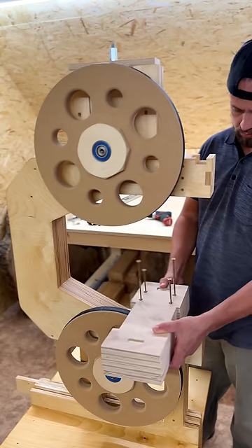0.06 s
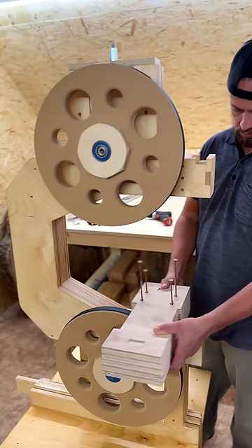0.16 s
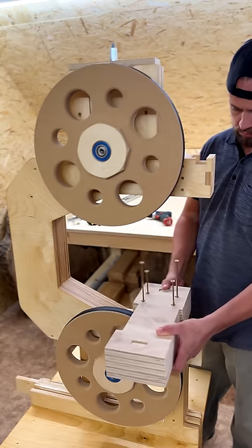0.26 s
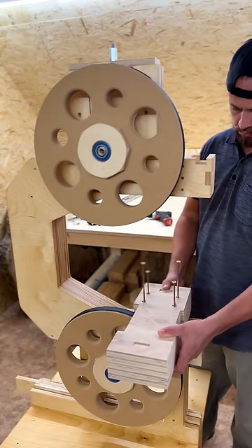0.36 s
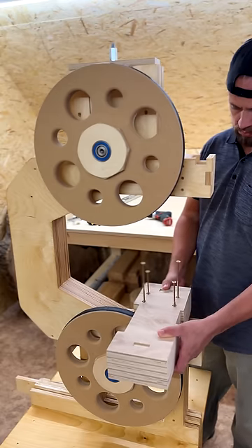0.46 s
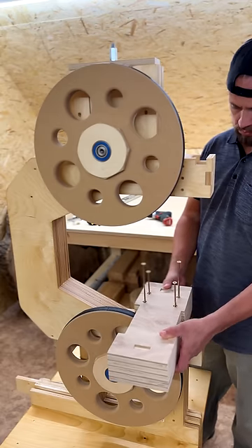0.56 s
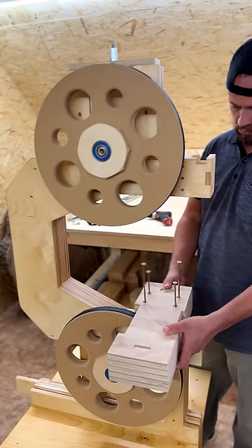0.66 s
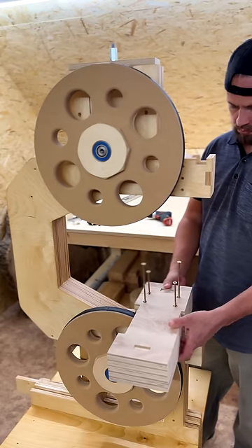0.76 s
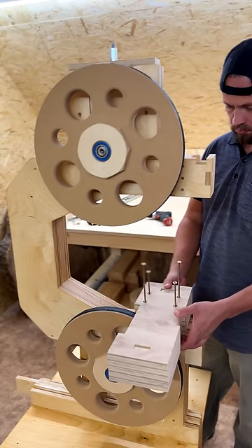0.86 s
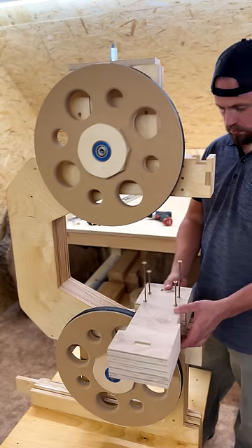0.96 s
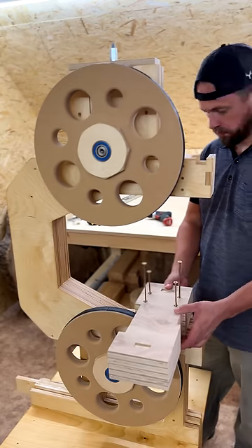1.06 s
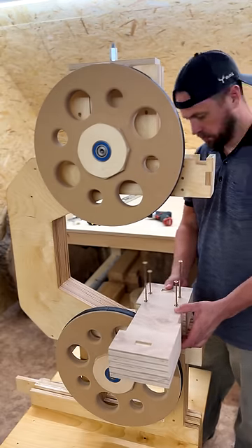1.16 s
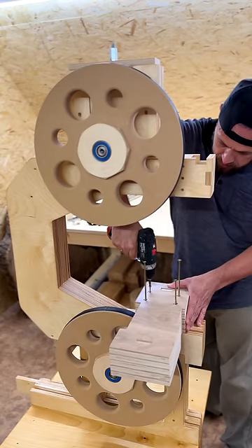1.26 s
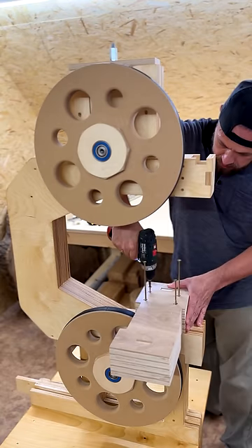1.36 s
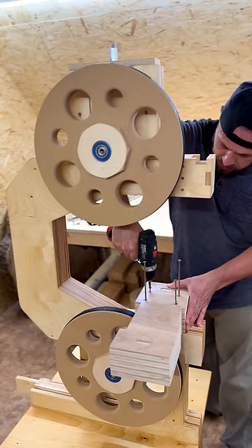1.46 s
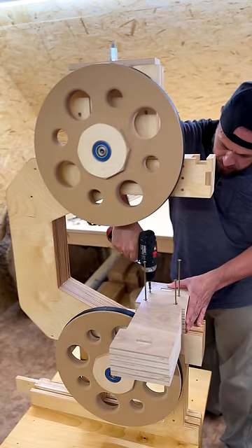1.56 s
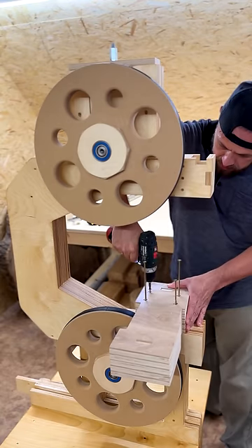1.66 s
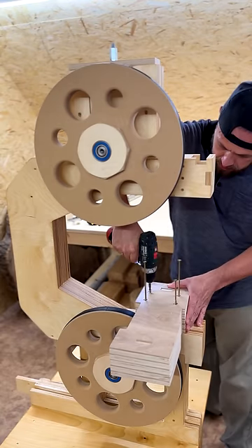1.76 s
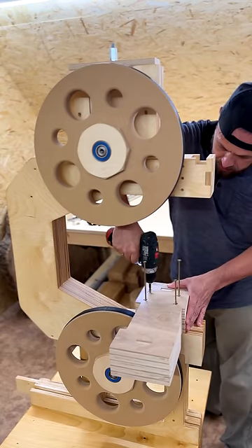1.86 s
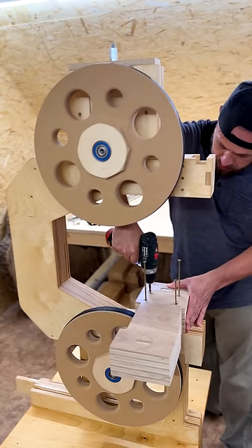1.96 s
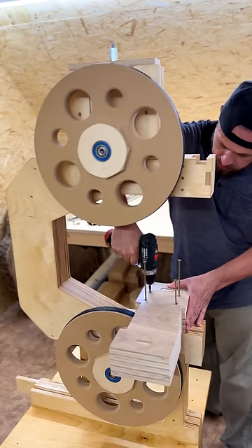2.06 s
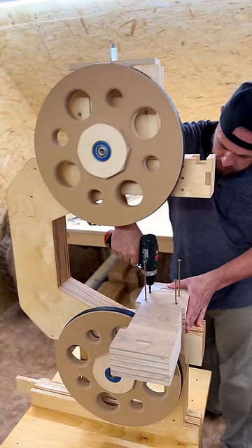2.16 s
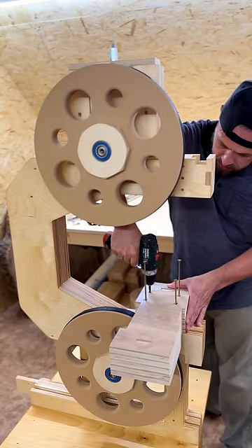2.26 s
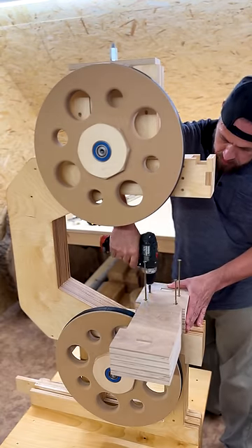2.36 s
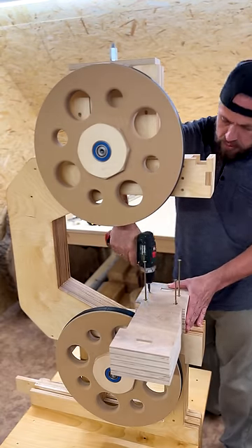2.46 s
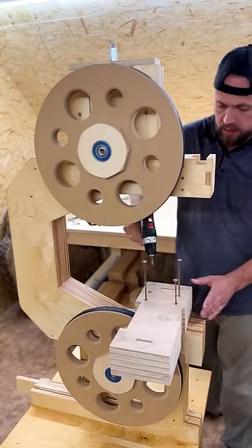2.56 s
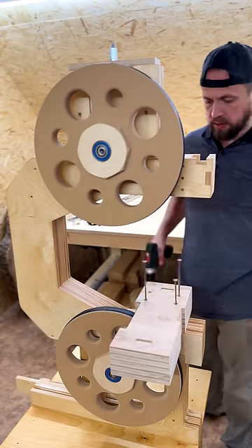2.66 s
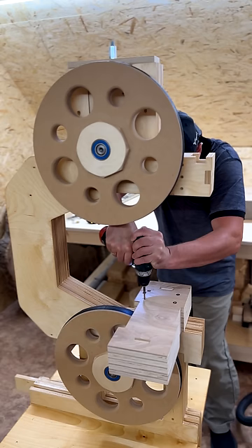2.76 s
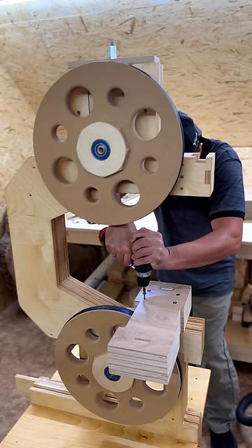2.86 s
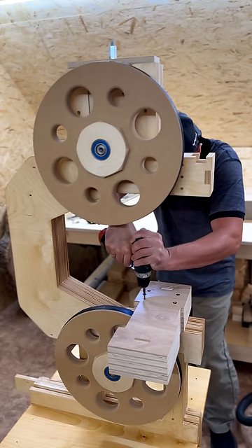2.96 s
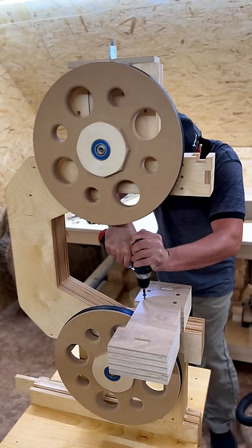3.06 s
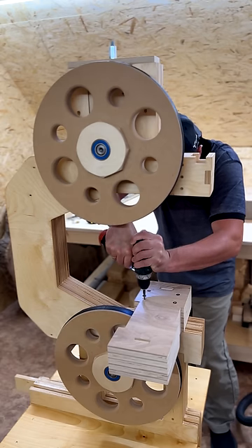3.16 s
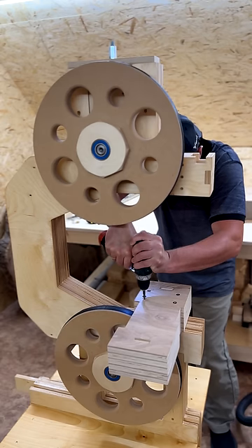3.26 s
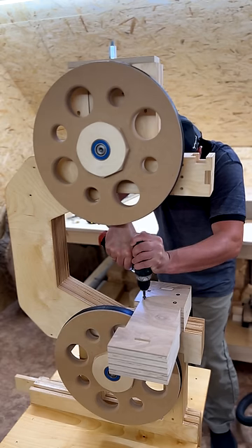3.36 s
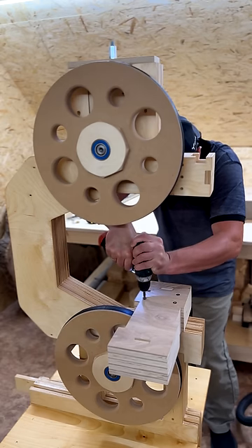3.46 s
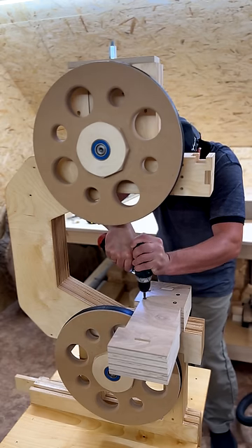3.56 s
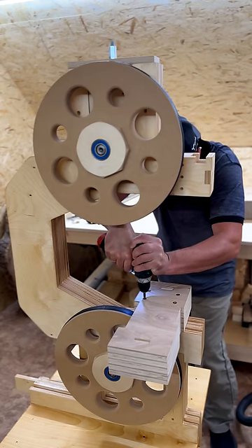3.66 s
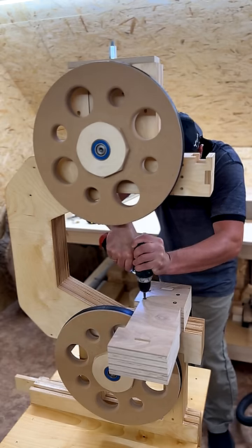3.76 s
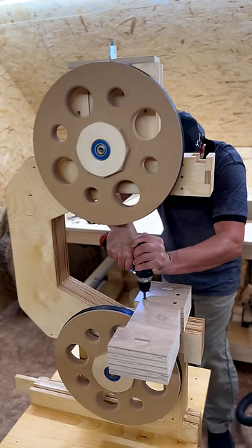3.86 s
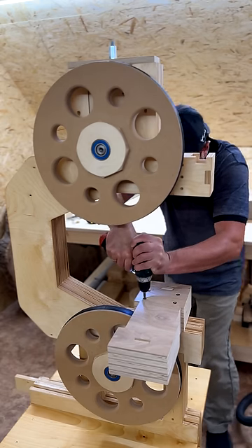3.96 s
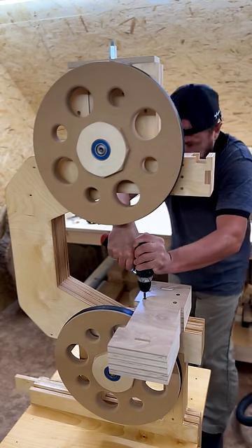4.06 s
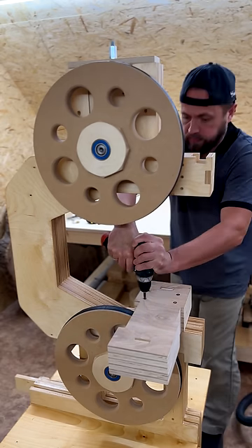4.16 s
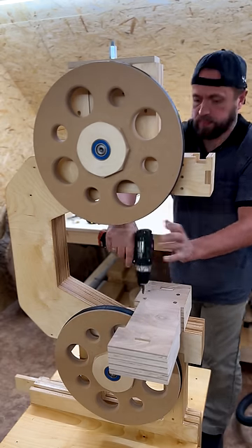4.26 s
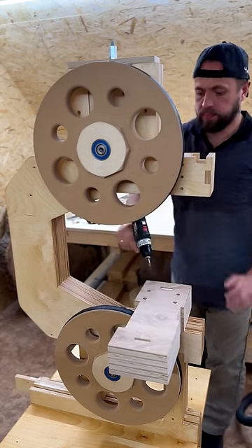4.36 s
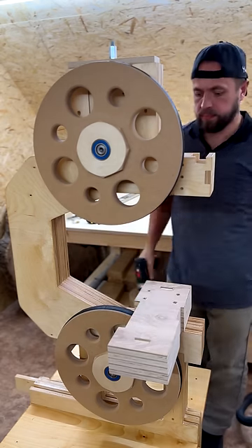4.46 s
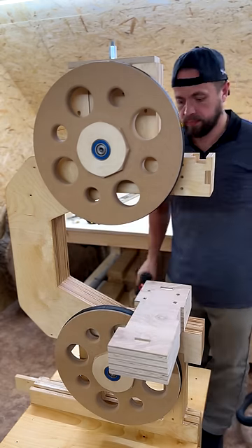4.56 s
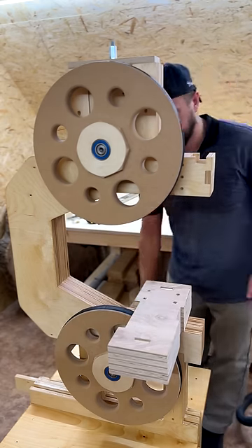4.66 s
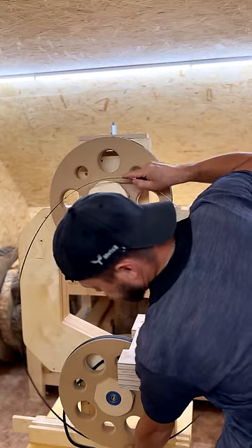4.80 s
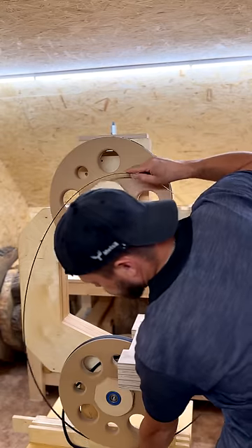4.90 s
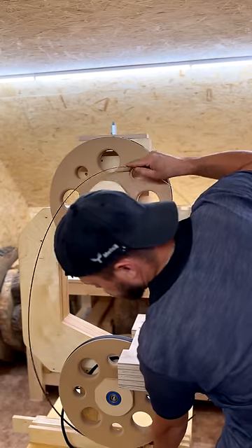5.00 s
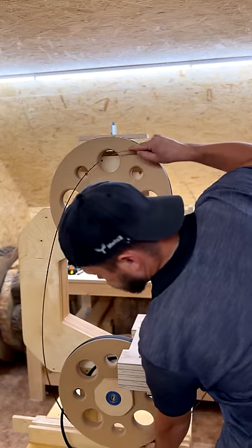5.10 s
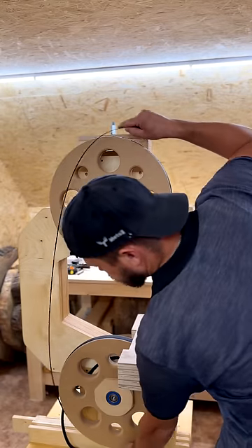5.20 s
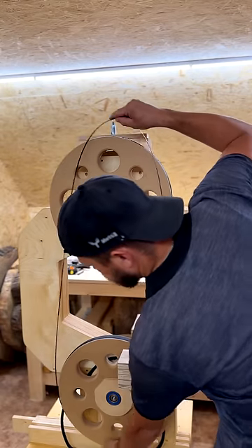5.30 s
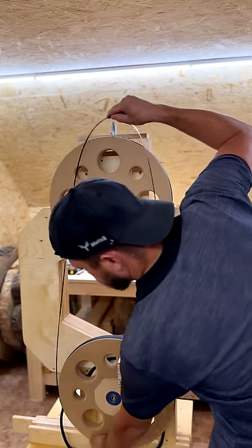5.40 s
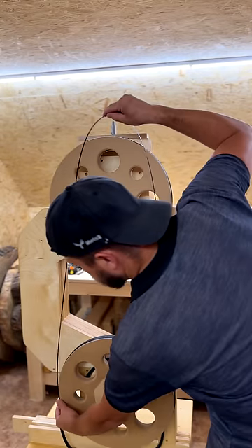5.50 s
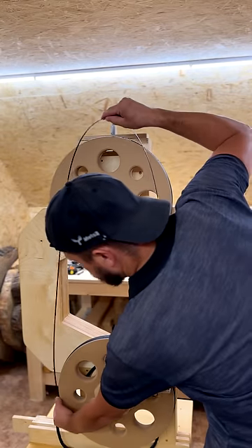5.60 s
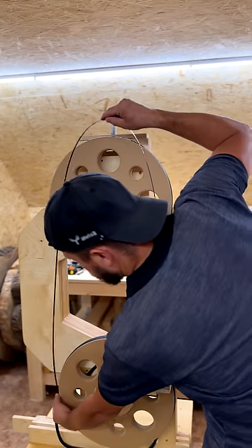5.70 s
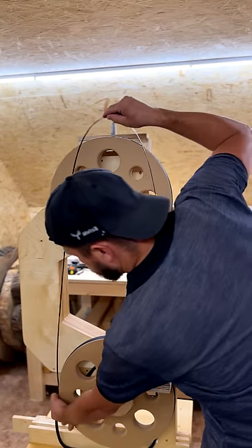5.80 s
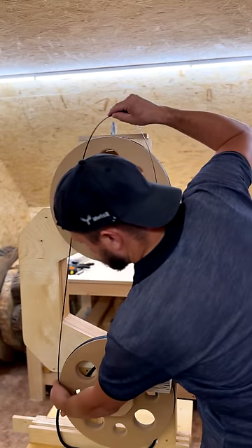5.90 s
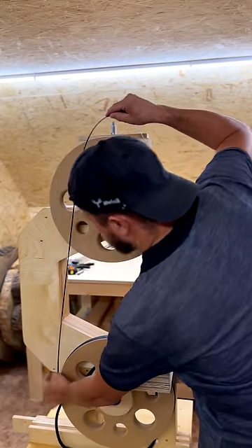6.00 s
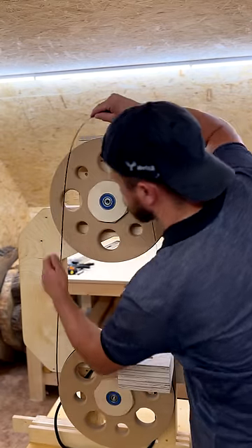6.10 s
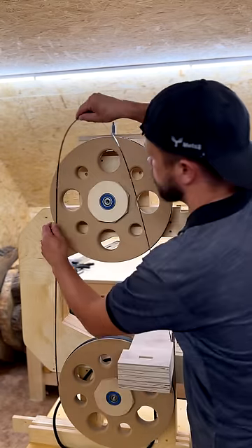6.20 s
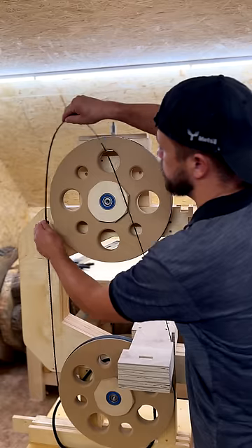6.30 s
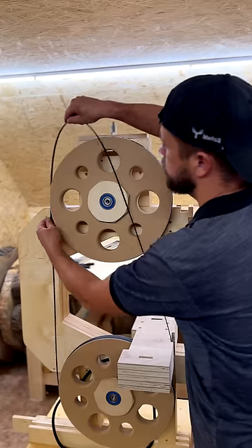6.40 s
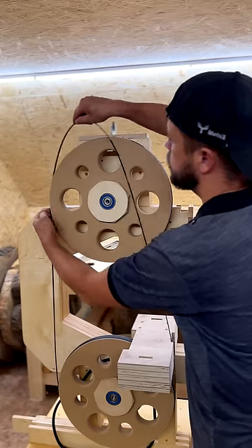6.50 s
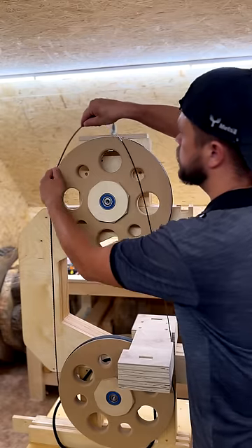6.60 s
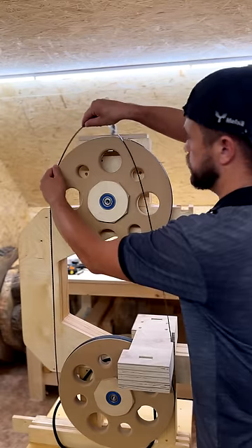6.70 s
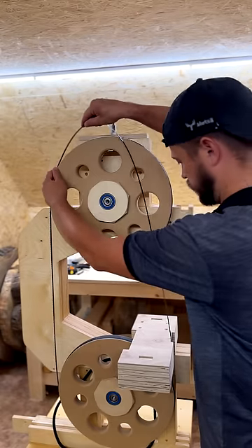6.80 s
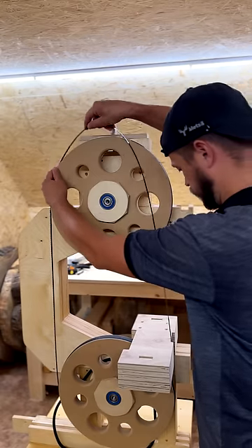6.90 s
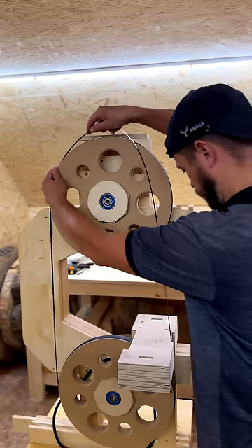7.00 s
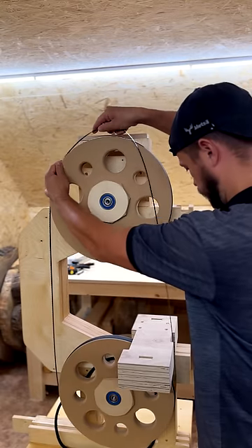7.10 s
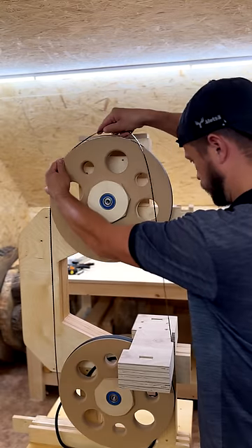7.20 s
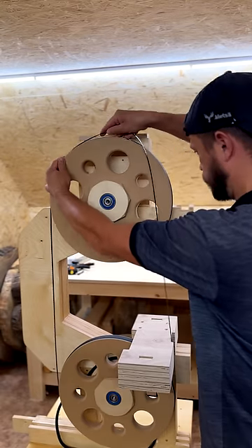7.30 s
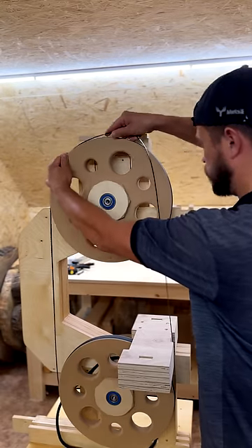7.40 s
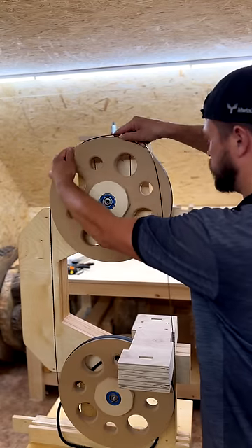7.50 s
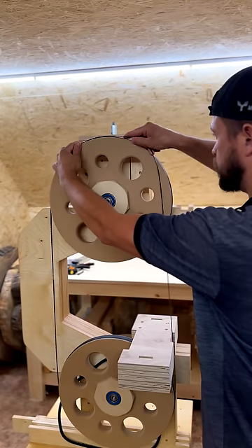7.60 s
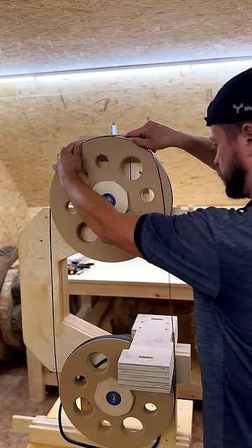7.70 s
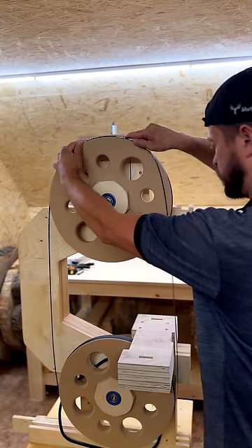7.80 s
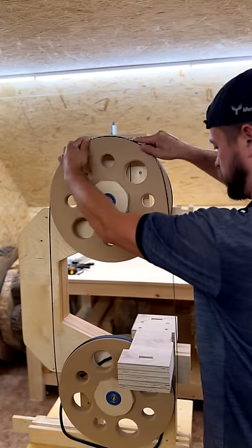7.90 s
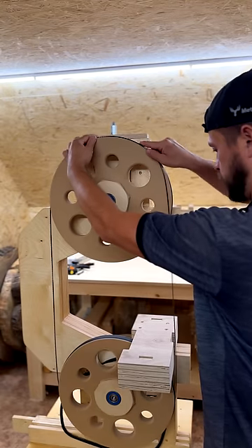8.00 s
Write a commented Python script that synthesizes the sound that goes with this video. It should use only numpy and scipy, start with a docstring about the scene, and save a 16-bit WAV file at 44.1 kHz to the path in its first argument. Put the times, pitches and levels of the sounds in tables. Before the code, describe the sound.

Close, slightly roomy stereo sound of workshop work. A power driver starts abruptly, screeches and hisses, stumbles as the bit jumps loose, and stops with cracks. It runs again, labours, then rattles rapidly like a tiny metal jackhammer before stopping with two lighter bangs. Afterwards, near silence holds faint hum and hiss, clothing swishes, springy steel ticks and dull taps on plywood, busiest at the end.

```python
"""A cordless impact driver sinks two screws into a plywood arm in a small board-lined workshop.
Tones tied to the motor speed, brush and fan hiss and shaken wood make its whine; the bit slips with a bang,
and late in the second screw the hammer rattles in a row of blows that ring tool and wood. Later a steel band
blade is laid over wooden wheels: bursts of noise ring the band as scrapes and clicks, among knocks on wood.
Cloth swishes and the hum and hiss of the room lie behind, and short dying reflections surround it all."""
import sys
import numpy as np
from scipy import signal
from scipy.fft import rfft, irfft
from scipy.io import wavfile

SR = 44100
rng = np.random.default_rng(int(sys.argv[2]) if len(sys.argv) > 2 else 0)


def persist_wave(psi):
    """Save psi, clipped to +-1, as 16-bit WAV."""
    counts = np.round(np.clip(psi, -1, 1) * 32767).astype(np.int16)
    wavfile.write(sys.argv[1], SR, np.atleast_2d(counts).T)


N = 355005
TIME = np.arange(N) / SR  # seconds
FIRST_BLOW_S = 3.6425  # the hammer engages


def amp(db):
    """Turns decibels into a factor."""
    return 10 ** (np.asarray(db) / 20)


def rms_one(x):
    """Scales a sound to an average strength (rms) of 1."""
    return x / np.sqrt(np.mean(x ** 2) + 1e-20)


def in_time(rows):
    """Columns of a table joined by straight lines in time."""
    s, *columns = np.transpose(rows)
    return [np.interp(TIME, s, column) for column in columns]


def colour(x, spectrum):
    """Filters x by the spectrum without letting it sound early (minimum phase)."""
    size = 8192
    hz, db = np.transpose(spectrum)
    bins_hz = np.fft.rfftfreq(size, 1 / SR)
    gain = amp(np.interp(np.log(bins_hz + 1), np.log(hz), db))
    # folding the cepstrum forward moves all the energy to the earliest moment
    cepstrum = irfft(np.log(gain))
    cepstrum[1:size // 2] *= 2
    cepstrum[size // 2 + 1:] = 0
    response = irfft(np.exp(rfft(cepstrum)))
    return signal.fftconvolve(x, response)[:len(x)]


def noise(spectrum):
    """Steady noise with the shape of a spectrum, rms 1."""
    return rms_one(colour(rng.standard_normal(N + SR), spectrum)[SR:])


def drift(rate_hz):
    """Slow random wavering of spread 1, computed at every 40th sample."""
    r = np.exp(-80 * np.pi * rate_hz / SR)
    slow = signal.lfilter([1], [1, -2 * r, r * r], rng.standard_normal(N // 40 + 2002))[2000:]
    return np.interp(np.arange(N) / 40, np.arange(len(slow)), rms_one(slow))


def ring(x, modes):
    """x strikes a body, and each of its modes (pitch Hz, level dB, time to fall 60 dB s) rings."""
    out = 0
    for hz, db, t60_s in modes:
        r = amp(-60 / (max(t60_s, .005) * SR))
        w = 2 * np.pi * hz / SR
        # the tiny offset keeps the filter from slowing down in silence
        out = out + signal.lfilter([0, amp(db) * np.sin(w)], [1, -2 * r * np.cos(w), r * r], x + 1e-18)
    return out


def band(x, order, low_hz, high_hz):
    """Keeps only the part of x between two frequencies."""
    return signal.sosfilt(signal.butter(order, [low_hz, high_hz], "band", fs=SR, output="sos"), x)


def high_pass(x, hz):
    """Takes away the lows of x."""
    return signal.sosfilt(signal.butter(4, hz, "high", fs=SR, output="sos"), x)


def add(out, s, sound, db):
    """Lays a sound into out at time s with its peak at db."""
    i = round(s * SR)
    out[i:i + len(sound)] += (amp(db) * sound / np.abs(sound).max())[:N - i]


def dying(t60_s, rise_s=0, hold_s=0):
    """A burst of noise that swells, is held and dies away, falling 60 dB in t60_s."""
    t = np.arange(SR // 3) / SR
    fall = amp(-60 * np.maximum(t - hold_s, 0) / t60_s)
    swell = np.minimum(1, (t + 1e-4) / (rise_s + 1e-4))
    return rng.standard_normal(len(t)) * fall * swell


def strokes(rows):
    """Gain of sounds that fade in, glide from one level to another and fade out."""
    fade_s = 0.022
    gain = 0
    for start, end, start_db, end_db in rows:
        times = [start - fade_s, start, end, end + fade_s]
        levels = [start_db - 40, start_db, end_db, end_db - 38]
        gain = gain + amp(np.interp(TIME, times, levels, -150, -150))
    return gain


def motor():
    """Slightly wavering tones on the motor speed, hiss of brushes and fan, and wood shaken through the bit."""
    # motor speed, bogging down around each slip: [time_s, turns_per_s]
    speed = [(1.22, 434), (1.52, 421), (1.65, 418.5), (1.8, 416), (1.85, 345), (1.865, 315), (1.96, 315),
             (1.975, 342), (1.99, 368), (2.005, 390), (2.05, 404), (2.19, 403), (2.225, 392), (2.255, 350),
             (2.47, 200), (2.79, 421), (2.95, 417), (3.32, 410), (3.45, 406), (3.54, 399), (3.62, 378)]
    # motor and gear tones: [multiple_of_turns, then levels before the changes below: start_db,
    # before_first_slip_db, after_first_slip_db, second_screw_start_db, second_screw_end_db]
    whine = [(1.0, -7, -7, -16, -14, -8), (1.495, -13, -4, -22, -38, -22), (1.565, -20, -25, -13, 1.5, -30),
             (1.94, -12, -13, -24, -36, -22), (2.92, -44, -40, -22, -29, -18), (3.79, -10, -16, -8, -4, -1),
             (3.97, -14, -15, -14, -22, -22), (4.07, -42, -41, -9, -20, -22),
             (4.18, -11, -11, -15, -16, -5), (5.95, -41, -28, -28, -13, -15),
             (7.58, -20, -12, -7, -14, -13), (7.88, -16, -18, -13, -18, -26),
             (8.32, -14, -14, -7, -15, -20), (13.45, -20, -7, -6, -13, -20),
             (14.93, -26, -24, -14, -17, -24), (19.25, -30, -30, -13, -30, -32),
             (19.53, -28, -26, -30, -13, -14)]
    # moments between which the tone levels glide: [time_s]
    stages_s = (1.33, 1.5, 1.89, 1.91, 2.6, 2.9, 3.15, 3.5)
    # shape of the brush and fan hiss: [frequency_hz, level_db_per_hz]
    hiss_shape = [(530, -36.5), (900, -12.5), (956, -20.5), (1170, -12.5), (1460, -9), (1590, -6),
                  (2020, -12.5), (3100, -8), (3400, -6.5), (3750, -10), (4250, -12), (5550, -10),
                  (5960, -10), (9310, -13.5), (11600, -3.5), (15100, -1), (16000, -11)]
    # shape of the shaking wood: [frequency_hz, level_db_per_hz]
    shake_shape = [(24, -67), (40, -46), (102, -11), (293, -20.5), (407, -1), (450, -16), (633, 2),
                   (709, -14.5), (806, -9.5), (1200, -13.5), (1560, -42), (2640, -120)]
    # pulls of the trigger: [start_s, release_s, coast_to_silence_s, base_hiss_db, wood_shaking_db,
    # tone_strength_db (against the hiss)]
    runs = [(1.225, 2.274, 0.245, -37.5, -49, -5.5), (2.798, 4.103, 0.15, -37, -51.5, -6)]
    midway_db = -3  # the tones ease halfway down the second screw
    labour_hiss_db, labour_tone_db = -12, 28  # change per whole loss of speed
    stall_loss, stall_db = .15, -350  # past this loss the tones break off, dB per whole loss
    hammering_hiss_db, hammering_tone_db = 1.5, -34  # change once the hammer engages
    gear_lines, gear_db = 48, -12  # gear_db is against the hiss, before labour and hammering
    spin_up_s, coast_curve = 0.005, 2  # sound falls 60 dB over the coast, slowly at first

    turns = in_time(speed)[0]
    angle = 2 * np.pi * np.cumsum(turns) / SR
    bogged = np.maximum(0, 1 - turns / 400)  # share of speed lost below 400 turns per s
    hammering = np.clip((TIME - FIRST_BLOW_S) / .03 + .5, 0, 1)

    tones = 0
    for k, early, first, second, start, end in whine:
        middle = (start + end) / 2 + midway_db
        db = np.interp(TIME, stages_s, [early, first, first, second, second, start, middle, end])
        # the highest and lowest tones break up when the motor labours
        db += 2.8 * drift(20) - (k ** 4 / 150 + 80 * (k < 2)) * bogged
        tones = tones + amp(db) * np.sin(k * angle + .18 * np.sqrt(k) * drift(10))
    labour_db = labour_tone_db * bogged + stall_db * np.maximum(0, bogged - stall_loss)
    tones = tones * amp(labour_db + hammering_tone_db * hammering)

    # sparking makes the hiss gritty
    hiss = noise(hiss_shape) * amp(0.87 * drift(300) + 0.48 * drift(4.2))
    # faint wavering lines of the planetary gears, spread between the strong tones
    gears = 0
    for k in np.geomspace(2.2, 21, gear_lines) * rng.uniform(.98, 1.02, gear_lines):
        gears = gears + amp(3 * drift(12)) * np.sin(k * angle + 1.5 * drift(20))
    # they sink when the motor labours or hammers
    gear_gain = amp(gear_db - 60 * bogged - 20 * hammering)
    hiss = hiss + gear_gain * rms_one(colour(gears, hiss_shape))

    shake = noise(shake_shape) * amp(2 * drift(7.1))
    out = 0
    for start, release, coast, hiss_db, shake_db, tone_db in runs:
        spin_up = np.clip((TIME - start) / spin_up_s + .5, 0, 1)
        coasting = amp(-60 * np.clip((TIME - release) / coast, 0, 2) ** coast_curve)
        loud = amp(hiss_db + labour_hiss_db * bogged + hammering_hiss_db * hammering)
        out = out + spin_up * coasting * (loud * (hiss + amp(tone_db) * tones) + amp(shake_db) * shake)
    return out


def hammer():
    """Blows on the anvil: a thin bright crack, a steel clack, a duller burst and a ring of tool and bit."""
    # shape of the dull burst on the anvil: [frequency_hz, level_db_per_hz]
    anvil = [(35, -55.5), (60, -22.5), (103, -29.5), (142, -7.5), (233, -12.5), (315, -14), (540, 5.5),
             (579, -2.5), (862, -5), (2090, 8), (3500, 1), (3940, -1.5), (9130, -6), (12400, -19.5),
             (16000, -37.5)]
    # tool and wood set ringing: [pitch_hz, relative_level_db, t60_s]
    tool = [(146, -17, 0.07), (588, -13, 0.1), (2135, -6, 0.06), (665, -14, .1), (1400, -16, 0.08),
            (1255, -16, 0.06), (1830, -14, 0.06), (2770, -14, 0.03)]
    # the ringing bit: [pitch_hz, relative_level_db, t60_s]
    bit = [(3480, -4, 0.06)]
    # the bit rings louder once the screw seats: [time_s, level_db]
    seating = [(3.95, -9), (4.03, 0)]
    beat_s, blows = .01356, 38
    settle_s, settle_blows = .0072, 4.5  # the first blows come slower, then settle to an even beat
    hammer_db = -24.5  # base level that the parts are set against
    clack_db, blow_spread_db = -28.5, 1.8  # the spread is how much the clacks differ

    out, clicks = np.zeros(N), np.zeros(N)
    number = np.arange(blows)
    lateness = settle_s * (1 - np.exp(-number / settle_blows))
    for at in FIRST_BLOW_S + beat_s * number + lateness:
        db = hammer_db + 1.2 * rng.standard_normal()
        add(out, at, band(dying(0.0058, 0.00062), 3, 11000, 15800), db + 7.0)
        add(out, at, band(dying(.02), 2, 3000, 6200), clack_db + blow_spread_db * rng.standard_normal())
        add(out, at, colour(dying(0.17), anvil), db - 5.0)
        clicks[round(at * SR)] = amp(hammer_db + 1.5 * rng.standard_normal())
    seated = amp(in_time(seating)[0])
    ringing = ring(clicks, tool) + seated * ring(clicks, bit)
    return high_pass(out + amp(-8) * ringing, 125)


def slips():
    """The bit jumps out of the screw head: a bang with a bright crack over a boom of the wood."""
    # slips of the bit: [time_s, bang_peak_db, wood_boom_peak_db, bright_crack_peak_db]
    slip_rows = [(1.865, -13.5, -21, -26.5), (2.3328, -14, -24, -31), (2.377, -13.5, -22, -24),
                 (2.455, -31.5, -29.5, -46), (3.6289, -16.5, -21, -23), (4.16, -25, -27, -35),
                 (4.192, -22.5, -29.5, -25.5)]
    # shape of the bang: [frequency_hz, level_db_per_hz]
    bang = [(410, -31), (700, -5.5), (922, -25), (1250, 2), (1920, -0.5), (2160, 0.5), (2800, 0.5),
            (3840, -15.5), (4610, -11), (7590, -24), (14000, -12.5), (16000, -20)]
    # shape of the booming wood: [frequency_hz, level_db_per_hz]
    boom = [(18, -47.5), (30, -15), (156, 2.5), (299, -2.5), (389, 2), (581, 7), (721, -8.5), (829, -6),
            (982, -9), (1200, -6), (1560, -33), (2640, -120)]
    t60_s = 0.12

    out = np.zeros(N)
    for s, db, boom_db, crack_db in slip_rows:
        add(out, s, colour(dying(t60_s) + amp(-2.0) * dying(0.019), bang), db)
        add(out, s, colour(dying(1.8 * t60_s), boom), boom_db)
        add(out, s, band(dying(0.56 * t60_s), 2, 3300, 6500), crack_db)
    return out


def blade():
    """Edge and teeth touch and slide on the wood: dry scratch, and clicks that stir the steel band."""
    # steel touching wheel and frame: [time_s, peak_db, drag_held_s, drag_t60_s, dryness_db (before a
    # common 19 dB), favoured_pitch_hz]
    touches = [(4.255, -64, 0, .03, 15, 12000), (4.3328, -58, 0.038, 0.1, 0, 2700),
               (4.765, -55.5, 0.0066, .06, 12, 4060), (5.3, -67.5, 0.039, 0.06, 6, 2390),
               (5.3553, -58, .022, 0.05, -6, 3300), (5.396, -56, .03, 0.08, -10, 4000),
               (5.4155, -56, .035, 0.06, -7, 3200), (5.484, -57, .028, 0.05, -8, 6000),
               (5.491, -56, .015, 0.06, -12, 2350), (5.543, -63, .005, 0.07, -4, 2200),
               (5.566, -57.5, 0.008, 0.066, -4, 2620), (6.4468, -67, 0.0021, 0.13, -4, 2500),
               (6.46, -55.5, 0.0081, 0.059, -13, 2600), (6.641, -62.5, 0.028, 0.073, 0, 2770),
               (7.093, -33.5, 0.0014, 0.09, 7, 3200), (7.1437, -53, 0, 0.054, -5, 2800),
               (7.206, -52.5, 0.0091, 0.04, -9, 2560), (7.239, -62, 0.023, 0.06, 11, 2200),
               (7.628, -49.5, 0.0057, 0.087, 24, 3000), (7.7, -60, 0.018, 0.065, -2, 1800),
               (7.724, -45, 0, 0.062, -5, 3120), (7.823, -47, 0, 0.073, -3, 1930),
               (7.8502, -49.5, 0.0027, 0.055, -16, 2510), (7.9149, -47.5, 0.026, 0.067, -18, 1840),
               (7.987, -58, 0.0096, 0.06, 16, 6000), (8.0275, -61, 0.0016, 0.057, -5, 2400)]
    # ringing of the steel band: [pitch_hz, relative_level_db, t60_s]
    band_modes = [(1776, -4, .022), (2290, -4, .02), (3150, -5, .017), (3822, -6, .016), (5800, -11, .01),
                  (7300, -15, .006)]
    # blade sliding along the rim: [start_s, end_s, start_db, end_db]
    slides = [(5.36, 5.46, -93, -82), (7.13, 7.27, -76, -79.5), (7.66, 7.76, -71, -86),
              (7.79, 7.9, -69, -72), (7.92, 8.05, -68.5, -80)]
    favour_db_per_octave = 15.5

    out = np.zeros(N)
    for s, db, hold, t60_s, dryness_db, hz in touches:
        # uneven strength from sample to sample makes the drag grainy
        drag = dying(t60_s, 0.0015, hold) * rng.exponential(1, SR // 3) ** 0.68
        # pitches and levels differ a little at every touch; those far from the favoured pitch are weaker
        modes = np.array(band_modes) + rng.standard_normal((len(band_modes), 3)) * [25, 2.5, 0]
        modes[:, 1] -= favour_db_per_octave * np.abs(np.log2(modes[:, 0] / hz))
        scratch = band(drag, 2, hz / 2.2, min(hz * 2.45, 16000))
        add(out, s, ring(drag, modes) + amp(19 + dryness_db) * scratch, db)

    # clumped catches of the teeth
    grains = rng.standard_normal(N) * (rng.random(N) < .05 * amp(5 * drift(25)))
    slide = ring(grains, band_modes) + amp(22) * band(grains, 1, 1100, 6500)
    return out + strokes(slides) * rms_one(slide)


def knocks():
    """Soft, uneven blows into the plywood, each a band of noise that also rings the board."""
    # knocks on wood: [time_s, peak_db (before the lows are cut), t60_s, blow_centre_hz]
    knock_rows = [(0.311, -46.5, 0.1, 400), (0.358, -51.5, 0.1, 447), (1.131, -38.5, 0.12, 610),
                  (1.157, -49, 0.14, 410), (4.282, -48, 0.06, 190), (4.335, -57, 0.14, 487),
                  (5.543, -53, 0.08, 450), (5.565, -47, 0.039, 745), (5.573, -42, 0.053, 330),
                  (6.067, -57.5, 0.24, 600), (6.234, -56, 0.054, 230), (6.457, -59, 0.12, 594),
                  (6.591, -50.5, 0.087, 240), (7.099, -40.5, 0.28, 315), (7.631, -41.5, 0.1, 760),
                  (7.644, -47, 0.15, 300), (7.701, -52.5, 0.23, 600), (7.73, -49.5, 0.1, 300),
                  (7.947, -48.5, 0.13, 295)]
    # ringing of the plywood: [pitch_hz, relative_level_db, t60_s]
    plywood = [(182, -4, 0.23), (330, 2.5, 0.061), (495, 3.5, 0.0076), (658, 5, 0.059), (890, 17.5, 0.0095),
               (1330, 10, 0.01)]

    out = np.zeros(N)
    for s, db, t60_s, hz in knock_rows:
        blow = band(dying(t60_s, rise_s=.005), 2, hz / 2.7, hz * 1.56)
        add(out, s, ring(blow, plywood) + amp(29.5) * blow, db)
    return high_pass(out, 130)


def rustle():
    """Cloth rubbing in short swishes of wavering noise."""
    # clothes and hands moving: [start_s, end_s, start_db, end_db]
    swishes = [(2.62, 2.745, -86, -63.5), (4.29, 4.58, -72.5, -73.5), (4.58, 4.76, -68, -72.5),
               (5.36, 5.48, -71, -73), (6.08, 6.32, -75.5, -80.5)]
    # shape of the cloth noise: [frequency_hz, level_db_per_hz]
    cloth = [(180, -32.5), (300, -6.5), (584, -4), (1030, -13.5), (1120, -8.5), (1300, -14), (4750, -19.5),
             (7080, -25.5), (16000, -22.5)]
    return strokes(swishes) * amp(2.0 * drift(40)) * noise(cloth)


def room_tone():
    """Wavering low hum, faint hiss and a thin tone; hum and hiss change colour at once partway through."""
    # room levels: [time_s, hum_db, hiss_db]
    air = [(0.0, -65.5, -78), (0.76, -65.5, -74), (1.2, -64.5, -78), (2.7, -69, -81.5), (4.32, -62, -87),
           (4.52, -64, -76), (4.7, -56, -79), (4.76, -58, -82), (4.78, -68.5, -82), (7.52, -71, -83),
           (8.05, -64, -83)]
    # shape of the hum at first: [frequency_hz, level_db_per_hz]
    early_hum = [(15, -68), (25, -47), (113, -4.5), (132, -6.5), (167, -20), (295, -33), (344, -26),
                 (437, -40.5), (476, -32.5), (1500, -55), (1950, -88), (3300, -120)]
    # shape of the hiss at first: [frequency_hz, level_db_per_hz]
    early_hiss = [(880, -44.5), (1500, -14.5), (1740, -10.5), (1980, -11), (4500, -3), (9280, -15),
                  (11700, -6), (16000, -3)]
    # shape of the hum later: [frequency_hz, level_db_per_hz]
    late_hum = [(15, -67), (25, -39), (92, -32), (136, 1), (156, 4), (295, -10.5), (327, -14), (437, -14),
                (1240, -26.5), (1500, -35), (1950, -60), (3300, -120)]
    # shape of the hiss later: [frequency_hz, level_db_per_hz]
    late_hiss = [(880, -26), (1500, -16), (1940, -21), (2770, -5), (3920, 1), (5220, 0), (7100, 5),
                 (16000, -11)]
    # a thin tone lingers after the second screw: [start_s, end_s, start_db, end_db (before wavering)]
    thin_tone = [(4.28, 4.45, -76, -82), (4.54, 4.72, -80, -77)]
    colour_change_s, thin_tone_hz = 4.768, 1110

    hum_db, hiss_db = in_time(air)
    hum = np.where(TIME < colour_change_s, noise(early_hum), noise(late_hum))
    hiss = np.where(TIME < colour_change_s, noise(early_hiss), noise(late_hiss))
    tone = np.sin(2 * np.pi * thin_tone_hz * TIME + 1.6 * drift(20))
    tone = strokes(thin_tone) * tone * amp(4 * drift(15))
    return amp(hum_db + 2.2 * drift(8.5)) * hum + amp(hiss_db) * hiss + tone


def workshop(x):
    """Dense dying reflections; an unrelated set of them forms the left-right difference."""
    # strength of the left-right difference: [frequency_hz, gain_db]
    width = [(60, -16), (110, -41.5), (200, -24.5), (380, -20.5), (700, -14.5), (1290, -1.5), (2380, -7.5),
             (4400, -8), (8120, -1), (15000, -9)]
    room_t60_s, room_db = 0.17, -11

    tail = dying(room_t60_s)
    # the second set swells in gradually
    other = dying(room_t60_s) * (1 - amp(-600 * np.arange(SR // 3) / SR))
    mid = x + amp(room_db) * signal.fftconvolve(x, tail / np.linalg.norm(tail))[:N]
    side = colour(signal.fftconvolve(x, other / np.linalg.norm(other))[:N], width)
    return np.array([mid + side, mid - side])


def scene():
    """All sources in the room."""
    return workshop(motor() + hammer() + slips() + blade() + knocks() + rustle() + room_tone())


def record(dry):
    """Each microphone capsule adds a faint noise of its own; the top is cut steeply near 16 kHz."""
    # shape of the microphone noise: [frequency_hz, level_db_per_hz]
    mic_noise = [(20, -9.5), (60, -4), (130, -13), (300, -1.5), (1300, -16), (2400, -16), (5500, -30.5),
                 (16000, -25)]
    own = amp(-81.5) * np.array([noise(mic_noise), noise(mic_noise)])
    return signal.sosfilt(signal.cheby2(14, 70, 16250, fs=SR, output="sos"), dry + own)


dry = scene()
out = record(dry)
persist_wave(out)
```